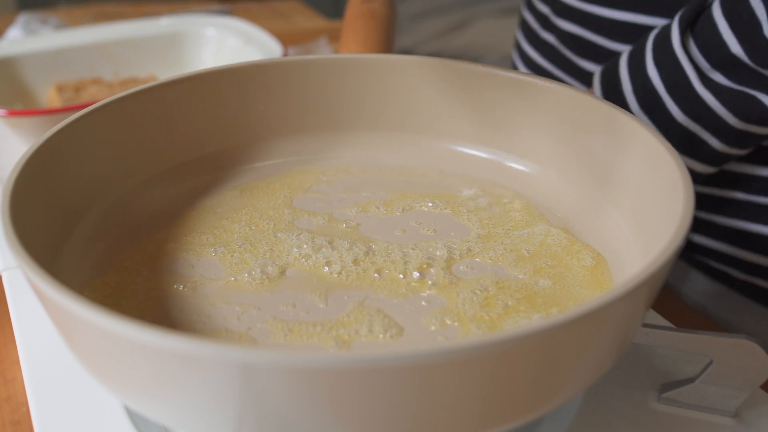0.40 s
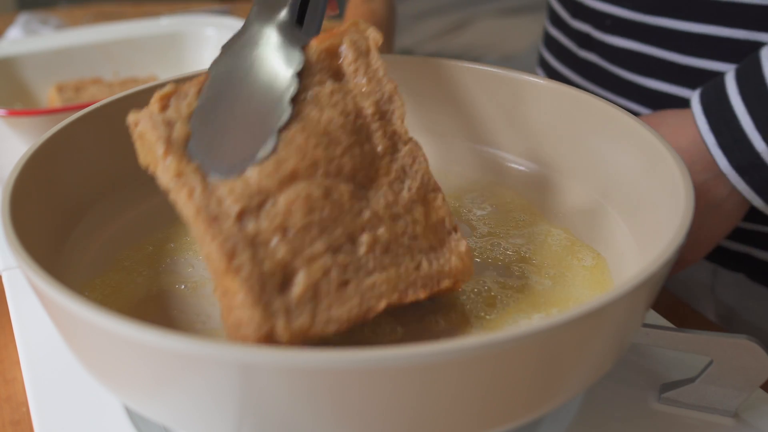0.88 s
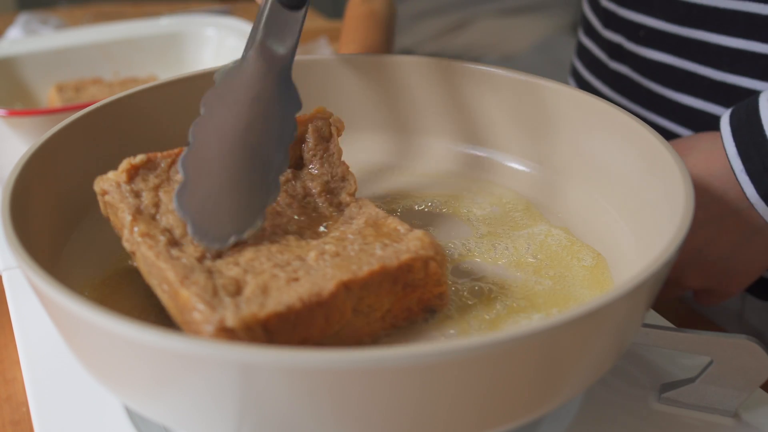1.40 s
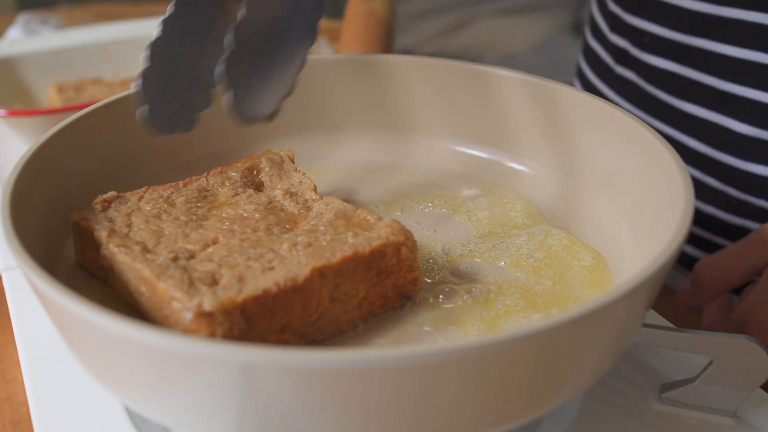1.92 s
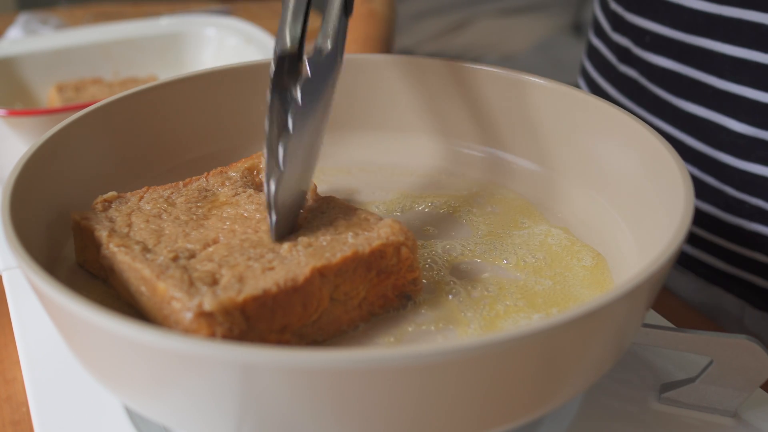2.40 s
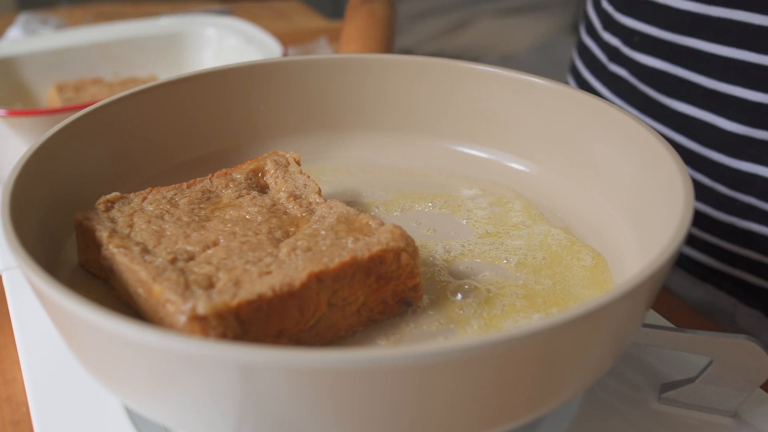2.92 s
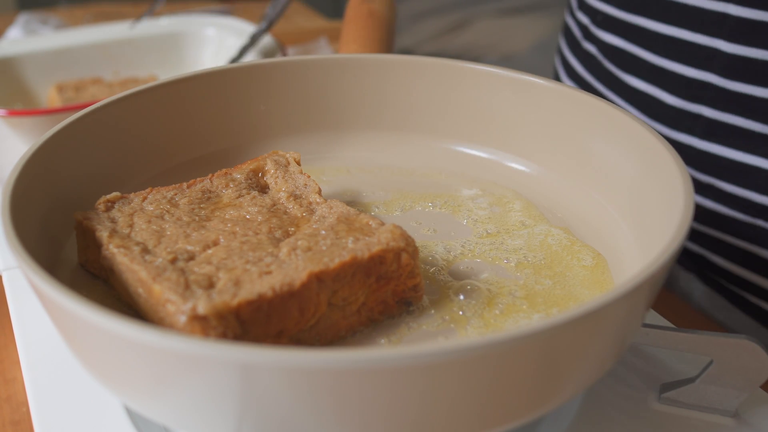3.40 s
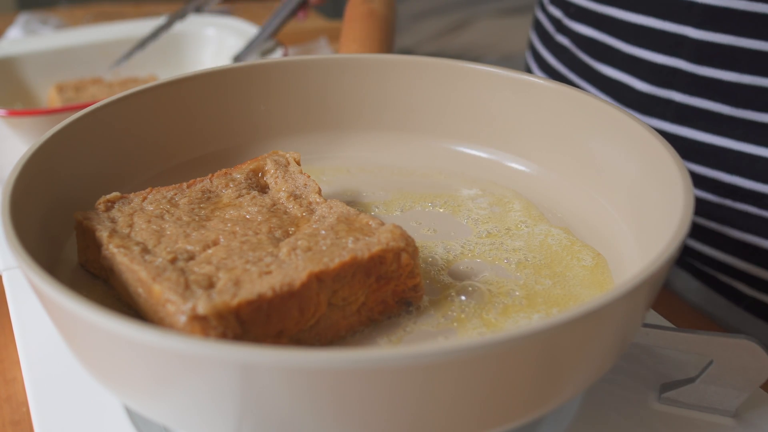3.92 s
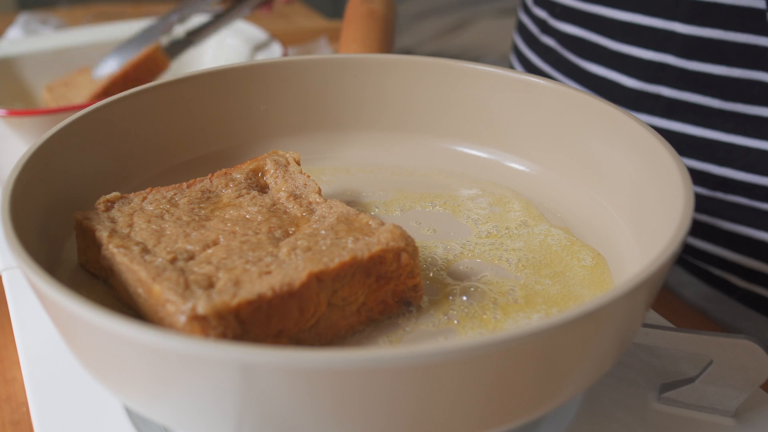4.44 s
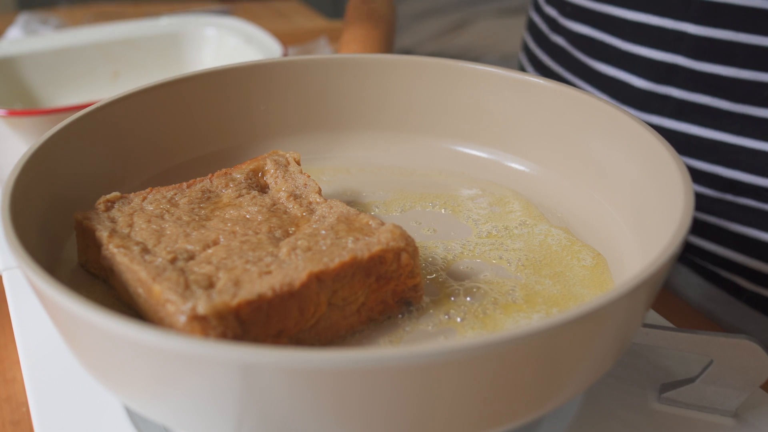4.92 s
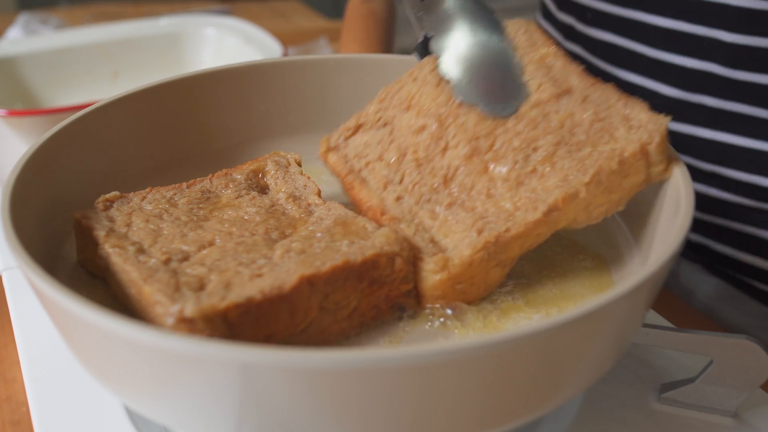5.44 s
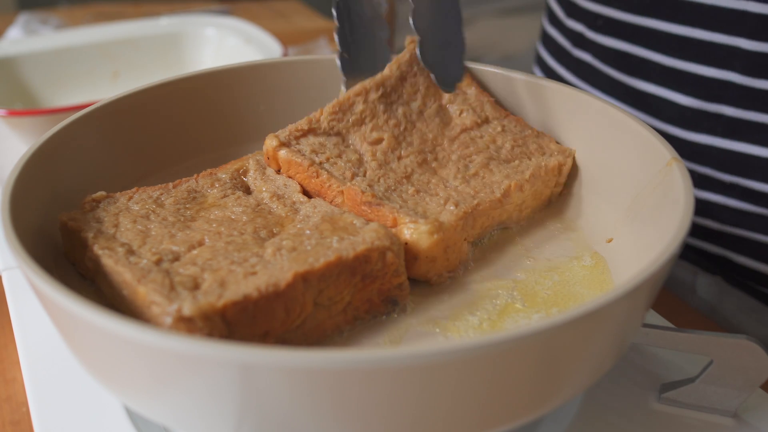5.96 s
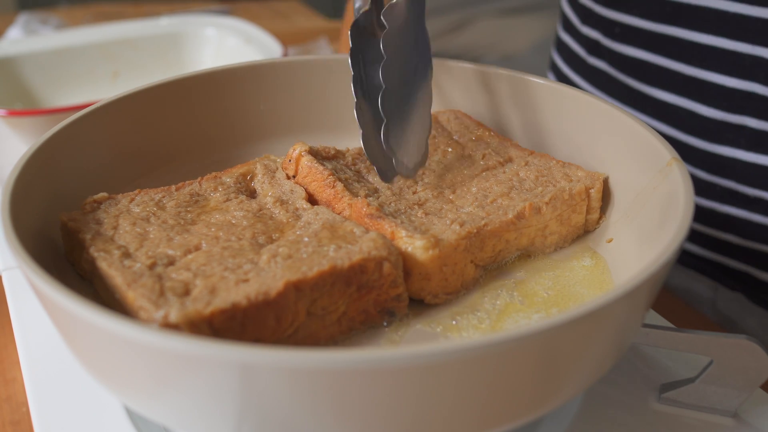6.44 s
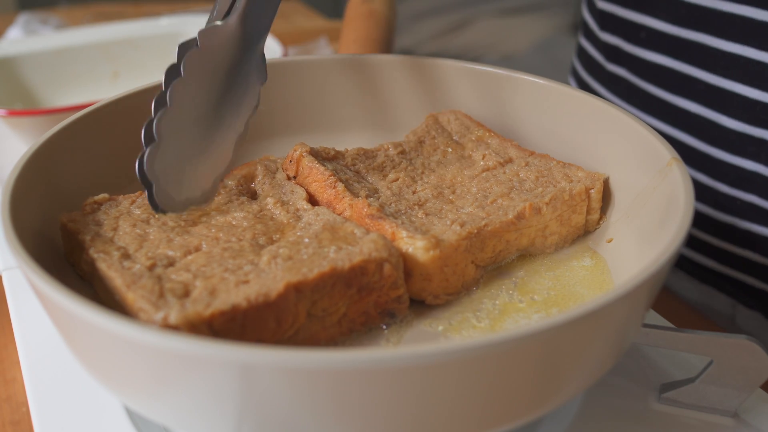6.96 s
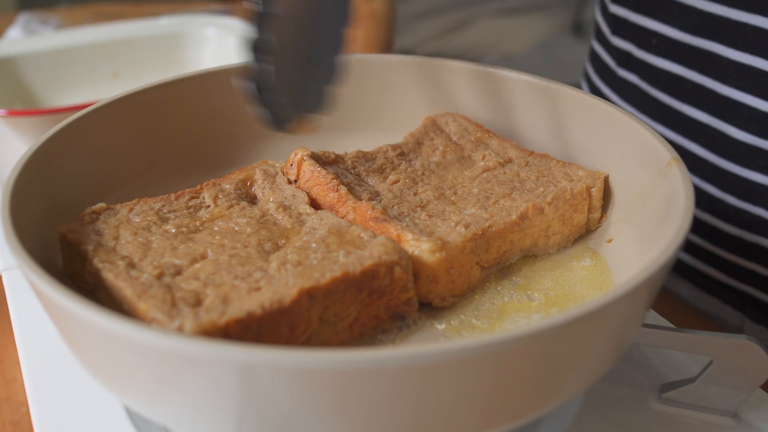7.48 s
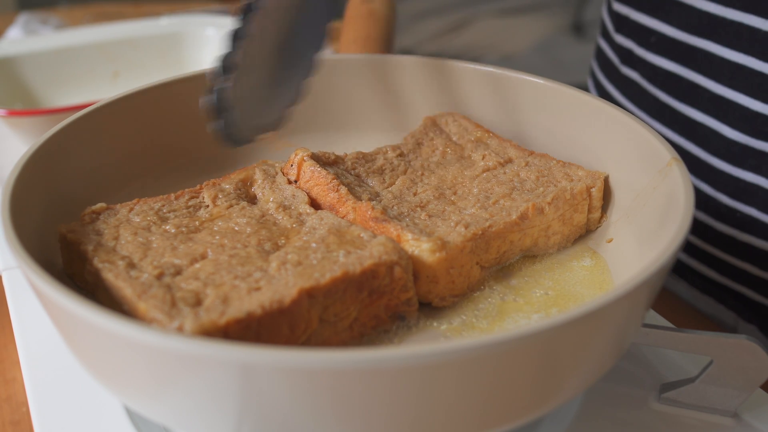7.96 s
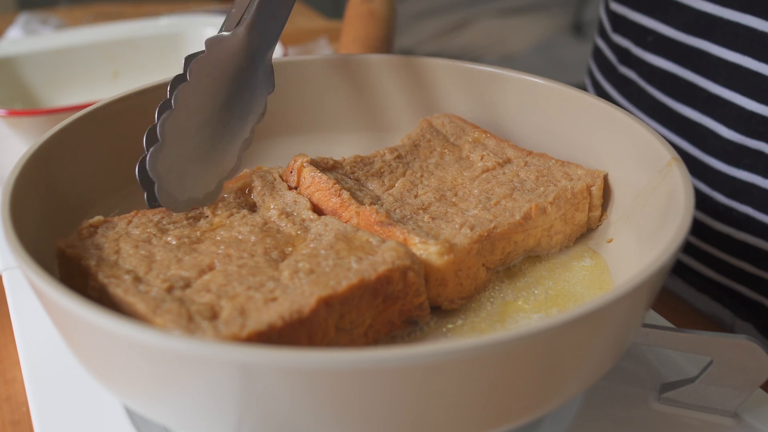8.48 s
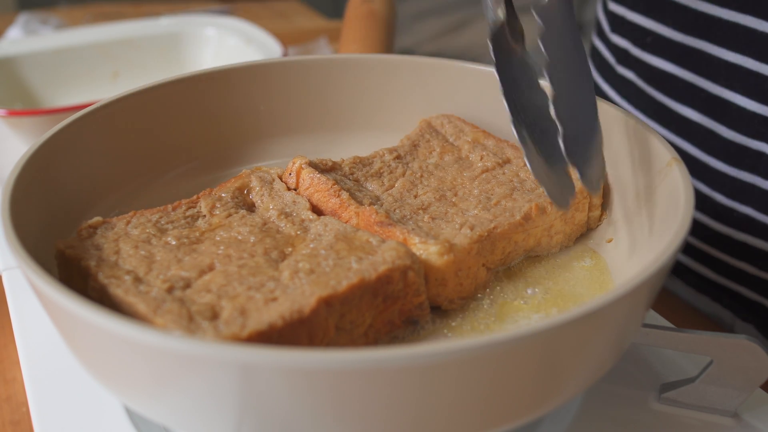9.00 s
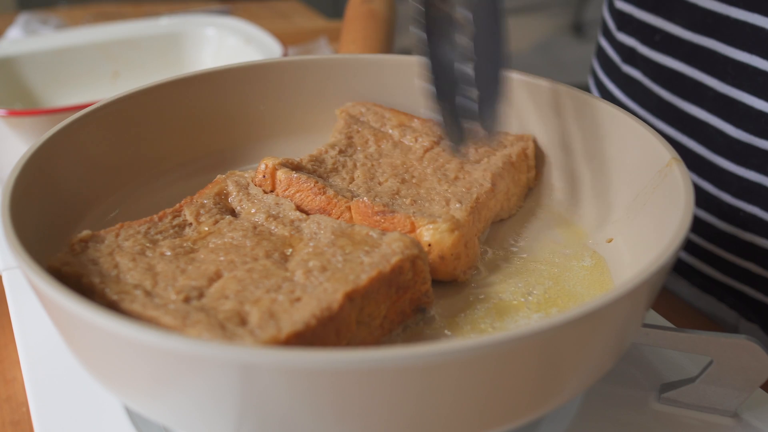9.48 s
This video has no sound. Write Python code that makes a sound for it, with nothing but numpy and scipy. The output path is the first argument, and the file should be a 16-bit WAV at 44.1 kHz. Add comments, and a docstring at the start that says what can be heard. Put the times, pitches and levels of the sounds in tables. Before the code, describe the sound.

A close, nearly mono perspective on a wide frying pan in a small kitchen, with soft low room rumble and a short tail. For the first 0.9 seconds butter only foams: fine high ticks, small pops and a faint dull slide near 0.4. At about 0.95 sharp bright pops announce the first soaked bread slice, and a dense, wet mid-range sizzle rises, with a light tong tick at 1.34 and swells until about 2.5. It eases into steady crackle with isolated snaps; between 3.57 and 3.75 a dish beside the pan clinks and is scraped lightly. Frying continues, quieter, until 5.4. The second slice brings a surge, a ringing pan knock at 5.71, and the loudest hiss and spitting through 6.5. Pressing then brings shorter swells around 7.2, 7.8 and 8.3, before the sizzle thins, with one last gentle brighter swell and small pops around 9.2 to 9.4.

```python
"""A small kitchen, one microphone close to a wide pan in which butter foams.
Two soaked bread slices are laid in and pressed with steel tongs. Bursting steam bubbles are short random
clicks in narrow bands and brief damped sines: a dense sizzle with single loud pops. The tongs, the pan and
a dish beside it ring as sums of damped modes when knocked; dull bumps and slides are low hollow notes
stirred by noise. A short noise tail answers over a soft room rumble; the two channels are nearly alike."""
import sys
import numpy as np
from scipy import signal
from scipy.fft import rfft, irfft
from scipy.io import wavfile
from scipy.ndimage import uniform_filter1d

SR = 44100
rng = np.random.default_rng(int(sys.argv[2]) if len(sys.argv) > 2 else 0)


def to_wav(s):
    """Save 16-bit WAV."""
    ch = np.atleast_2d(s).T  # columns
    pcm = np.round(np.clip(ch, -1, 1) * 32767)  # PCM
    wavfile.write(sys.argv[1], SR, pcm.astype(np.int16))


def volts_from_db(level):
    """Convert decibel levels to linear amplitude ratios."""
    exponent = np.asarray(level, float) / 20
    return 10 ** exponent


N = 424241  # length in samples


def level(x, db):
    """Set the rms."""
    return x * volts_from_db(db) / np.sqrt(np.mean(x ** 2))


def response(points):
    """Causal minimum-phase impulse response through (Hz, dB) points, by folding the cepstrum."""
    hz, db = np.transpose(points)
    grid_hz = np.arange(1025) * SR / 2048 + 1
    log_gain = np.interp(np.log(grid_hz), np.log(hz), db) * np.log(10) / 20
    cepstrum = irfft(log_gain)
    cepstrum[1:1024] *= 2
    cepstrum[1025:] = 0
    return irfft(np.exp(rfft(cepstrum)))


def colour(x, points):
    """Filter through (Hz, dB) points."""
    return signal.oaconvolve(x, response(points))[:N]


def highpass(x, hz):
    """Second-order Butterworth high-pass."""
    return signal.sosfilt(signal.butter(2, hz, "highpass", fs=SR, output="sos"), x)


def ring(hz, t60, size):
    """A damped sine that falls 60 dB in t60 seconds."""
    t = np.arange(size) / SR
    return np.sin(2 * np.pi * hz * t) * np.exp(-np.log(1000) * t / t60)


def add(out, s, x):
    """Mix x in at time s."""
    i = int(s * SR)
    out[i:i + len(x)] += x[:N - i]


def walk(rate):
    """Random levels held 1 / rate s and slewed; spread near 1."""
    k = int(SR / rate)
    steps = np.repeat(rng.standard_normal(N // k + 1), k)
    return 1.16 * uniform_filter1d(uniform_filter1d(steps, k), k)[:N]


def puffs(per_s, fade_ms, spread_db):
    """Steam escapes in small sudden puffs of uneven size that fade within a few milliseconds."""
    size = volts_from_db(np.minimum(spread_db * rng.exponential(size=N), 3 * spread_db))
    hit = (rng.random(N) < per_s / SR) * size
    return signal.lfilter([1], [1, -np.exp(-1000 / (fade_ms * SR))], hit)


def clicks(per_s, spread_db):
    """Single-sample bursts of either sign at random times, a few much stronger than the rest."""
    hit = rng.random(N) < per_s / SR
    sign = np.sign(rng.random(N) - 0.5)
    return hit * sign * volts_from_db(np.minimum(spread_db * rng.exponential(size=N), 2.6 * spread_db))


def bubbles(lo_hz, hi_hz, per_s, spread_db, hiss_db, surge, count=10):
    """Bursts of uneven size; each size of bubble rings in its own narrow band, some burst across all."""
    wide = clicks(per_s, spread_db)
    out = 0
    edges = np.geomspace(lo_hz, hi_hz, count + 1)
    for lo, hi in zip(edges[:-1], edges[1:]):
        burst = level(wide + 1.9 * clicks(0.7 * per_s, spread_db), 0)
        burst = burst + volts_from_db(hiss_db) * rng.standard_normal(N)
        band = signal.butter(1, [lo, hi], "bandpass", fs=SR, output="sos")
        flicker = volts_from_db(1.8 * walk(35) + 2.8 * walk(5))
        out = out + signal.sosfilt(band, burst) * flicker
    return out * surge


def ticks(per_s, low_hz, db):
    """Bubbles burst one by one, each a few cycles at its own pitch, from low_hz to five times that."""
    out = np.zeros(N)
    for when, pitch, size in rng.random((int(per_s * N / SR), 3)):
        hz = low_hz * 5.0 ** pitch
        peak_db = db - 3 * np.log(size + 0.012)  # db is near the weakest; a few are up to 13 dB stronger
        add(out, when * N / SR, volts_from_db(peak_db) * ring(hz, 4.64 / hz, size=260))
    return out


# The steady simmer in the pan: bare butter, first slice settling, resting, second slice settling, resting.
# Each row: time in seconds, gain of the large bubbles in dB, spray above them in dB.
SIMMER_LEVELS = [(0, -69.5, 6), (.9, -64, 3.5), (.95, -51.5, -4), (1.45, -47.5, -3.5), (1.86, -53, -5),
                 (1.91, -53, -1.5), (2.7, -53, -1), (3.498, -56.5, 0.5), (4.3, -56, 0.5), (5.38, -55.5, 0),
                 (5.44, -42, -0.5), (6.0, -44.5, -4.5), (6.65, -49, -2), (7.0, -50, -3.5),
                 (7.62, -50.5, -3.5), (8.15, -52.5, -3.5), (8.9, -55, 0.5), (9.62, -65, -12)]
# Short swells of the sizzle. Each row: peak time in seconds, swell in ms, die-away in ms,
# gain of the large bubbles in dB, spray above them in dB.
SIZZLE_SWELLS = [(.485, 18, 26, -56, -5), (.76, 25, 14, -68, 16), (.964, 15, 43, -49.5, 13),
                 (1.04, 61, 25, -48, 1), (1.395, 35, 35, -42.5, -14), (1.618, 180, 180, -44, 3.5),
                 (1.847, 87, 9.1, -40.5, -4.5), (2.209, 11, 14, -40, 6.5), (2.504, 29, 91, -42, -7),
                 (3.06, 8, 10.6, -41, 5.5), (3.67, 67, 110, -49.5, -10), (3.997, 83, 240, -48, -1.5),
                 (5.52, 20, 93, -45, 7.5), (5.785, 51, 86, -33.5, -4), (5.913, 57, 30, -37.5, -19),
                 (6.088, 54, 32, -44, 1), (6.228, 28, 80, -39.5, 6.5), (6.315, 130, 24, -44.5, 8),
                 (6.505, 100, 130, -45, 9.5), (7.182, 155, 116, -46.5, 3), (7.801, 54, 27, -38.5, 5.5),
                 (8.263, 48, 31, -42.5, 1.5), (8.53, 100, 120, -52, 3), (9.337, 300, 340, -47, 4.5)]


def activity(t):
    """Gains of large bubbles, spray and mist: the simmer plus short swells that rise and die by 10 dB."""
    simmer_mist_db, swell_mist_db = -3, -10  # finest mist against the spray
    mist_per_spray = 0.21  # a brighter simmer is mistier still, dB per dB
    s, db, spray_db = np.transpose(SIMMER_LEVELS)
    db, spray_db = np.interp(t, s, db), np.interp(t, s, spray_db)
    mist_db = db + (1 + mist_per_spray) * spray_db + simmer_mist_db
    power = volts_from_db([db, db + spray_db, mist_db]) ** 2
    for s, swell_ms, die_ms, db, spray_db in SIZZLE_SWELLS:
        shape = 0.1 ** (1000 * np.abs(t - s) / np.where(t < s, swell_ms, die_ms))
        peak = volts_from_db([db, db + spray_db, db + spray_db + swell_mist_db]) ** 2
        power = power + np.outer(peak, shape)
    return np.sqrt(power)


# Colour of the bursts, shaped by the pan bowl and the close microphone: large bubbles with one slice,
# large bubbles with two slices, and the fine spray. Each row: frequency in Hz, gain in dB.
ONE_SLICE_COLOUR = [(240, -32), (495, -9.5), (932, 1), (1090, -1.5), (1330, 3.5), (1800, -8.5), (2200, 2.5),
                    (2550, 3.5), (2800, 0.5), (3770, 2.5), (7000, -8.5), (9100, -20), (15400, -120)]
TWO_SLICE_COLOUR = [(180, -36.5), (300, -4.5), (489, -7), (644, -2), (1310, 3), (1540, -3), (2280, -0.5),
                    (2610, -7.5), (3480, 4), (4900, -0.5), (7000, -14), (9100, -38), (15400, -120)]
SPRAY_COLOUR = [(2060, -36), (3500, -15.5), (4570, -11.5), (5620, -1.5), (7290, -0.5), (8790, 5.5),
                (10300, -11), (12600, -2), (14200, -3.5), (16100, -16), (16500, -95)]


def sizzle():
    """Large bubbles crackle in the middle range, spray and mist fizz on top."""
    second_slice_s, cover_s = 6.32, 0.36
    t = np.arange(N) / SR
    coarse = t[::SR // 1000]
    large_gain, spray_gain, mist_gain = (np.interp(t, coarse, g) for g in activity(coarse))
    shared = puffs(40, 5, 3.5)
    large_surge = 1 + 0.24 * shared + 0.39 * puffs(17, 8.6, 4.6)
    large = bubbles(301, 6530, 200, 3.4, -0.41, large_surge)
    fine_surge = 1 + 0.4 * shared + 0.2 * puffs(22, 4.3, 7.9)
    fine = bubbles(3000, 19845, 350, 6.5, -1.1, fine_surge, count=7)

    # the second slice fills the bowl and changes its colour
    cover = np.clip((t - second_slice_s) / cover_s, 0, 1)
    open_bowl = level(colour(large, ONE_SLICE_COLOUR), 0)
    full_bowl = level(colour(large, TWO_SLICE_COLOUR), 0)
    large = (1 - cover) * open_bowl + cover * full_bowl
    sputters = ticks(220, 1500, 8.5)  # mid-sized bubbles, dB over the large ones
    large = large + sputters

    # droplets of fat, dB over the fine bubbles; spray and mist are levelled afterwards
    spatters = ticks(300, 3000, 14)
    fine = level(colour(fine, SPRAY_COLOUR), 0) + colour(spatters, SPRAY_COLOUR)
    mist = signal.sosfiltfilt(signal.butter(4, 10200, "highpass", fs=SR, output="sos"), fine)
    spray = level(fine - mist, 0)
    return large * large_gain + spray * spray_gain + level(mist, 0) * mist_gain


def foam():
    """Tiny foam bubbles tick all through, each a brief high damped sine."""
    return ticks(per_s=45, low_hz=3000, db=-46)


# Colour of the diffuse rumble of the kitchen. Each row: frequency in Hz, gain in dB.
RUMBLE_COLOUR = [(15, -20), (25, 0), (60, 2.5), (95, -3.5), (146, 4), (178, 0), (213, 4), (245, -2.5),
                 (412, -6.5), (814, -5.5), (1540, -20.5), (2070, -13.5), (4000, -46), (8800, -120)]


def room_rumble():
    """Low coloured noise whose level drifts gently."""
    rumble = level(colour(rng.standard_normal(N), RUMBLE_COLOUR), -57.5)
    return rumble * volts_from_db(0.47 * walk(3.22))


# Single pops close to the microphone. Each row: time in seconds, peak of the ringing in dB,
# bubble pitch in Hz, spit rms in dB, snap rms at the burst in dB.
# Short rows have no snap, or no spit either.
SINGLE_POPS = [(0.023, -48, 3000, -55, -42.5), (0.028, -36.5, 910, -47.5, -36), (0.081, -43, 4000, -61),
               (0.299, -38, 5000, -56), (0.314, -44, 921, -52, -45), (0.321, -38, 6000, -56),
               (0.383, -33, 12500, -60, -47), (0.486, -23, 13100, -58, -36.5), (0.493, -31, 8100, -57),
               (0.531, -28, 3600, -43, -40), (0.5813, -33, 8000, -56), (0.621, -33, 880, -55, -36.5),
               (0.667, -41, 1330, -56, -49), (0.7013, -36, 4150, -54, -41), (0.835, -31, 8700, -57),
               (0.859, -31.5, 5570, -49, -51), (0.918, -31, 3320, -54, -31.5),
               (0.947, -19.5, 3650, -45, -41), (0.949, -13, 13900, -42), (0.959, -17, 5100, -43),
               (1.042, -23.5, 4230, -47, -46), (1.38, -26, 3500, -50), (1.589, -25, 2450, -61, -29),
               (1.635, -35, 1350, -34.5, -21.5), (1.747, -15, 6100, -45, -33), (1.812, -23, 4200, -58, -43),
               (1.865, -22.5, 4450, -59, -37), (2.196, -16, 13700, -50, -33),
               (2.196, -12.5, 4360, -36.5, -39), (2.204, -17, 5870, -46, -30),
               (2.357, -32, 13000, -40.5, -31.5), (2.452, -39, 5600, -41.5, -41),
               (2.837, -25, 2460, -51, -24.5), (3.017, -38, 1000), (3.052, -21.5, 4970),
               (3.305, -39, 6200, -41, -37.5), (3.389, -36, 1000, -60, -48), (3.55, -33, 4300),
               (3.972, -29, 2770, -56, -30), (4.35, -23, 13800, -48), (4.472, -20, 14000, -52, -32.5),
               (4.519, -24.5, 2340, -90, -43), (4.526, -23.5, 2300, -70, -44), (4.825, -27, 2400, -72, -47),
               (4.835, -26, 2340), (5.081, -28.5, 2390, -56, -45), (5.112, -28, 5670, -48.5),
               (5.328, -47, 2500, -46, -37), (5.444, -30, 1300, -50, -34), (5.508, -24, 6000, -48, -38),
               (5.611, -22, 4240, -44, -35), (5.663, -22, 5520, -54, -40), (5.777, -20, 7550, -29.5, -25),
               (5.787, -22, 2680, -38, -27), (5.894, -31, 2350, -42, -31), (5.905, -17, 4670, -49, -37),
               (5.911, -18, 4590, -38, -44), (5.934, -20, 1150, -60, -26), (5.9343, -21, 2300),
               (5.9346, -18, 3900), (5.995, -30, 3300, -58, -38), (6.024, -30, 2340, -47, -30.5),
               (6.084, -32, 1200, -50, -38), (6.178, -17, 8000, -37), (6.196, -26.5, 2280, -38, -44),
               (6.216, -18, 7800, -38, -47), (6.248, -13, 6940, -42, -40), (6.271, -28, 8300, -41),
               (6.343, -16, 8260, -41), (6.39, -21, 6060, -39, -48), (6.445, -24, 5100, -45),
               (6.494, -23, 8300, -37, -46), (6.511, -16, 5800, -51, -42), (6.569, -25, 7500, -45),
               (6.942, -33, 5600, -43, -40), (7.085, -26, 3460, -60, -28), (7.103, -24, 2190, -61, -35),
               (7.128, -27, 3820, -46, -46), (7.203, -22, 4560, -57, -41), (7.432, -27, 2220, -64, -38),
               (7.46, -20.5, 3560, -68, -42), (7.709, -18.5, 5600, -39.5, -51),
               (7.865, -34, 3870, -43, -45), (7.88, -21.5, 5800, -42, -51), (7.92, -38, 3870, -40, -42),
               (8.073, -33, 3420, -44), (8.254, -27, 6000, -48), (8.539, -24, 3270, -53, -44),
               (8.6301, -28.5, 3300, -58, -48), (8.668, -33, 3500, -56), (8.84, -34, 3800, -56),
               (9.021, -33, 3500), (9.11, -33, 980), (9.1267, -29, 8410, -50), (9.1759, -28, 8300, -53),
               (9.192, -32, 3460, -58, -36), (9.2035, -25, 7600, -53), (9.244, -29, 8000, -52),
               (9.341, -26, 3990, -44, -45)]


def pops():
    """Each bubble snaps, rings a few cycles at its pitch and spits a bright spray that patters out."""
    out, t = np.zeros(N), np.arange(1300) / SR
    bright, dull = response(SPRAY_COLOUR)[:300], response(ONE_SLICE_COLOUR)[:300]
    for s, db, hz, *extras in SINGLE_POPS:
        spit_db, snap_db = (*extras, -90, -90)[:2]  # -90 dB is as good as none
        fade = np.exp(-t / 0.00012) + 0.18 * np.exp(-t / 0.0021)
        grit = rng.standard_normal((2, len(t))) * fade
        grit[:, 0] = 1.72  # the burst itself
        body = np.convolve(grit[0], ring(hz, 7.3 / hz + 0.0018, size=300))[:len(t)]
        body *= volts_from_db(db) / np.max(np.abs(body))
        snap = np.convolve(grit[0], dull)[:len(t)]
        snap *= volts_from_db(snap_db) / np.std(snap[:SR // 1500])
        spit = level(np.convolve(grit[1], bright)[:len(t)], spit_db)
        add(out, s + 0.0007, body + snap + spit)
    return highpass(out, 500)


# Dull bumps and slides near the pan, some under knocks. Each row: start in seconds, rms in dB before
# the high-pass, pitch of the hollow note in Hz, length in ms (the push peaks at 0.3 of it and is cut
# at twice it).
BUMPS_AND_SLIDES = [(0.386, -53.5, 378, 50), (0.457, -47.5, 388, 42), (1.337, -51, 163, 16),
                    (3.727, -44.5, 138, 28), (5.71, -47, 174, 28), (8.182, -53.5, 282, 2.9),
                    (9.164, -56.5, 380, 29)]


def rubs():
    """A dull bump or rough slide judders every third cycle of a low hollow note and stirs its overtones."""
    out = np.zeros(N)
    for s, db, hz, ms in BUMPS_AND_SLIDES:
        t = np.arange(int(ms * SR / 500)) / SR
        judder = np.diff(np.floor(t * hz / 3), prepend=0) * volts_from_db(3 * rng.standard_normal(len(t)))
        push = t * np.exp(-t / (ms * 0.0003))
        grit = (judder + 0.09 * rng.standard_normal(len(t))) * push
        note = ring(hz, 0.045, size=4000) - 0.8 * ring(1.95 * hz, 0.03, size=4000)
        note += 0.45 * ring(1.32 * hz, 0.04, size=4000) + 0.25 * ring(3.4 * hz, 0.02, size=4000)
        add(out, s, level(signal.oaconvolve(grit, note)[:len(t) + 2000], db))
    return highpass(out, 110)


# Knocks on the tongs, the dish beside the pan, and the pan, by name. Each row: start in seconds,
# gain in dB, place struck from 0 to 1, contact in ms, scrape against the ringing in dB.
BLOWS = {"tongs": [(1.3371, -28, 0, 0.1, 13)], "dish": [(3.5675, -25, .24, 0.25, -3),
         (3.612, -36, 0.5, 0.4, -20), (3.666, -37, 0.46, 0.83, -20), (3.7284, -34, 0.24, 0.2, 11),
         (3.737, -32, 0.45, 0.3, 2), (3.7538, -32.5, 0.03, 0.3, -8)], "pan": [(5.710, -19.5, 0, 0.11, 8)]}
# Pitches each thing rings with. Each entry: frequency in Hz.
PAN_PITCHES = [210, 354, 583, 900, 1003, 1150, 1301, 1346, 1475, 2872, 3100, 3371, 3792, 4289, 4738, 5414,
               5600, 7108]
TONGS_PITCHES = [770, 960, 1400, 1534, 2345, 2850, 3500, 5400]
DISH_PITCHES = [618, 1170, 1389, 1545, 1750, 2262, 2930, 3270, 3860, 4888]
# How those pitches ring, in the same order. Each row: gain in dB, time to fall 60 dB in seconds.
PAN_RINGING = [(-22, .4), (-16, .25), (-14, .3), (-15, .28), (-7.5, .15), (1, .025), (-7, .18), (-6, .2),
               (-4, .15), (-.5, .1), (0, .03), (-3, .13), (-7, .12), (-4, .16), (5, .075), (-2, .06),
               (-7, .04), (1, .07)]
TONGS_RINGING = [(-2.5, .4), (5.5, .022), (-10, .08), (-11, .28), (-3, .04), (1, .025), (-2, .02),
                 (0, .015)]
DISH_RINGING = [(-14, .21), (-10, .09), (-6, .25), (-13, .16), (-10, .24), (-3.5, .17), (-4, .13),
                (-2.5, .13), (-10, .09), (-9, .05)]
# Weaker neighbours close by every pitch that beat against it. Each entry: thing, gain in dB.
NEIGHBOUR_GAIN = {"pan": -10, "tongs": -22, "dish": -11}


def knocks():
    """A short push rings the modes of the struck thing; steel chatters on it after the contact."""
    neighbour_stray = 0.045  # fraction of the pitch
    chatter_ms, chatter_power = 233, 2.01  # decay for a 1 ms contact; a softer contact chatters longer
    out, t = np.zeros(N), np.arange(SR // 2) / SR
    things = {"pan": (PAN_PITCHES, PAN_RINGING), "tongs": (TONGS_PITCHES, TONGS_RINGING),
              "dish": (DISH_PITCHES, DISH_RINGING)}
    scrape_band = signal.butter(2, [600, 12000], "bandpass", fs=SR, output="sos")
    for thing, blows in BLOWS.items():
        for s, db, place, contact_ms, scrape_db in blows:
            modes = 0
            for k, (hz, (gain_db, t60)) in enumerate(zip(*things[thing])):
                # a mode stays quiet when struck near its node, and a soft contact dulls the high ones
                share = np.cos(np.pi * k * place) / (1 + (hz * contact_ms / 1000) ** 2)
                strays = neighbour_stray * rng.uniform(-1.02, 1, size=2)
                near = sum(ring(hz * (1 + stray), t60, size=len(t)) for stray in strays)
                tone = ring(hz, t60, size=len(t)) + volts_from_db(NEIGHBOUR_GAIN[thing]) * near
                modes = modes + (-1) ** k * volts_from_db(gain_db) * share * tone
            decay_ms = chatter_ms * contact_ms ** chatter_power
            chatter = rng.standard_normal(len(t)) * np.exp(-t * 1000 / decay_ms)
            rattle = signal.oaconvolve(0.011 * chatter, modes)[:len(t)]
            scrape = volts_from_db(scrape_db) * signal.sosfilt(scrape_band, chatter)
            add(out, s, volts_from_db(db) * (modes + rattle + scrape))
    return highpass(out, 125)


def kitchen(x):
    """The room answers with a short, diffuse, slightly dull tail of decaying noise."""
    t60_s, tail_db = 0.47, -13.5  # tail energy against the direct sound
    t = np.arange(int(0.5 * SR)) / SR
    onset = np.minimum(t / 0.001, 1)
    tail = rng.standard_normal(len(t)) * np.exp(-np.log(1000) * t / t60_s) * onset
    tail = signal.lfilter([1], [1, -0.3], tail)
    tail *= volts_from_db(tail_db) / np.sqrt(np.sum(tail ** 2))
    tail[0] = 1  # direct sound
    return signal.oaconvolve(x, tail)[:N]


def scene():
    """Everything near the pan passes through the room; the rumble is already diffuse."""
    near_pan = sizzle() + foam() + pops() + rubs() + knocks()
    mono = kitchen(near_pan) + room_rumble()
    # a faint, filtered side signal makes the two channels slightly unlike
    side_colour = [(20, 14), (80, 7), (200, 0), (600, 2.5), (2000, -14), (16000, -5)]
    side = volts_from_db(-34) * colour(np.roll(mono, SR // 200), side_colour)
    return np.array([mono + side, mono - side])


def roll_off(x):
    """The treble ends steeply here."""
    return signal.sosfilt(signal.butter(12, 16980, fs=SR, output="sos"), x)


def record(dry):
    """The finished two-channel mix goes to the file's sound."""
    return roll_off(dry)


dry = scene()
out = record(dry)
to_wav(out)
```